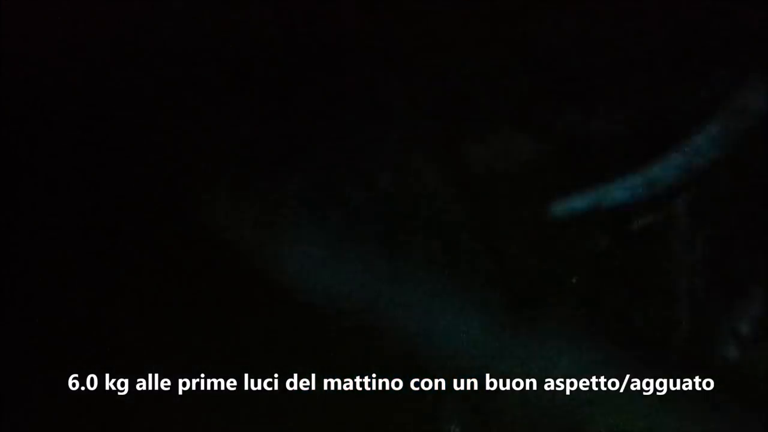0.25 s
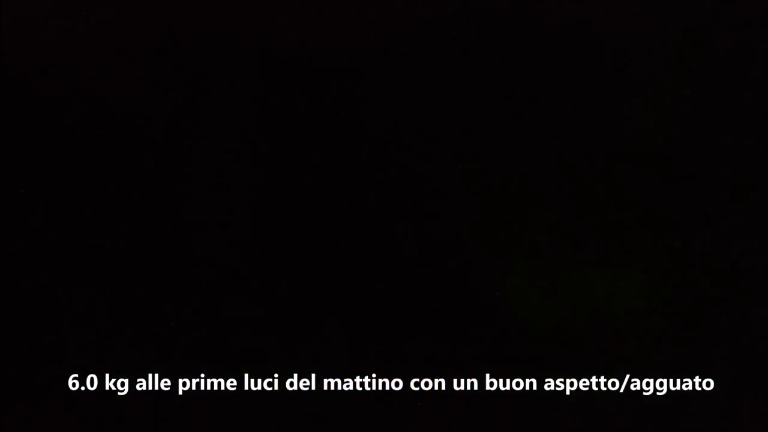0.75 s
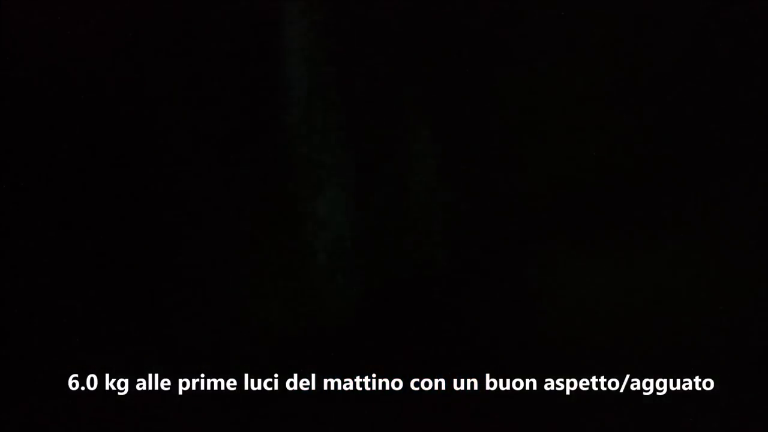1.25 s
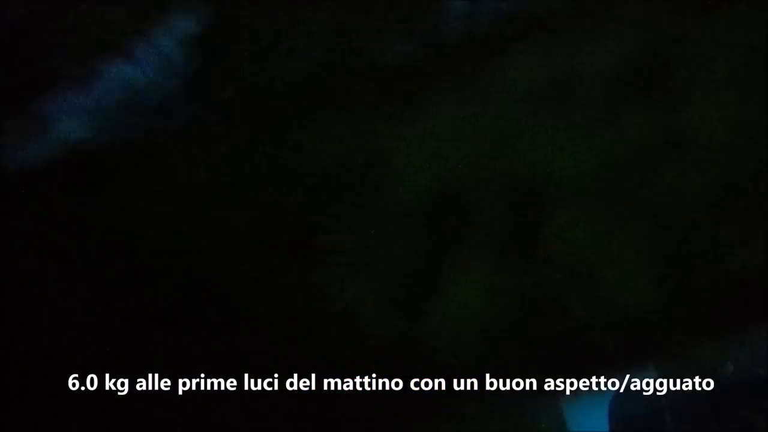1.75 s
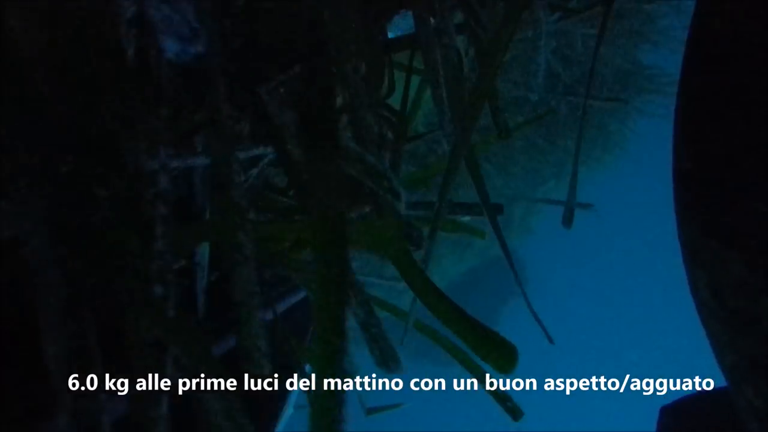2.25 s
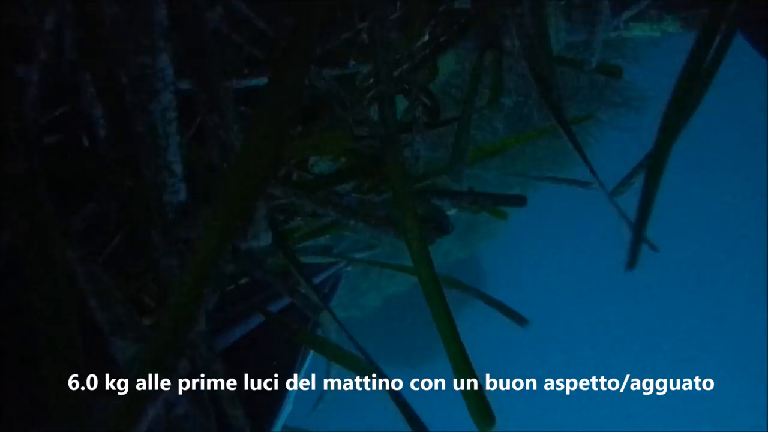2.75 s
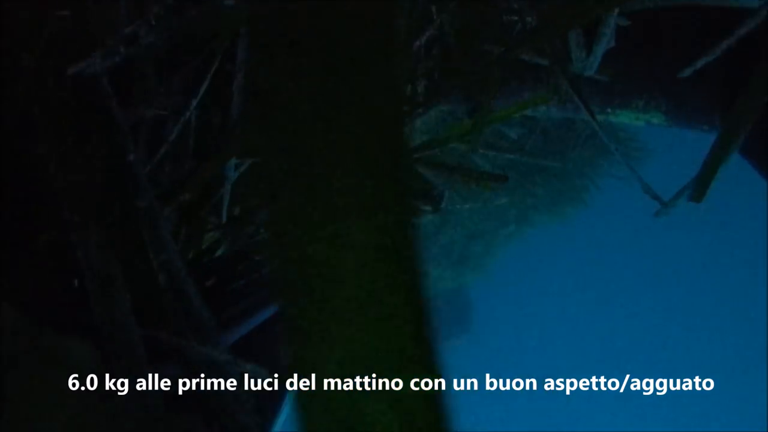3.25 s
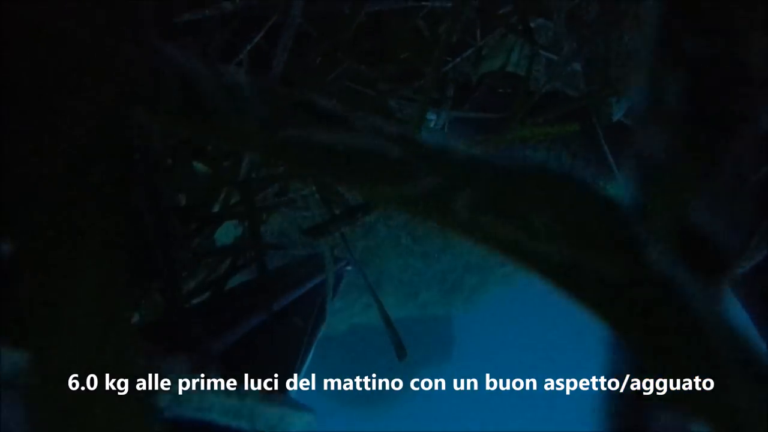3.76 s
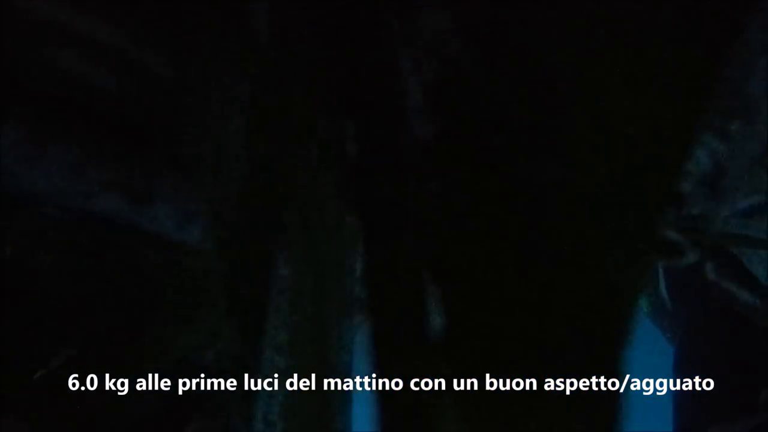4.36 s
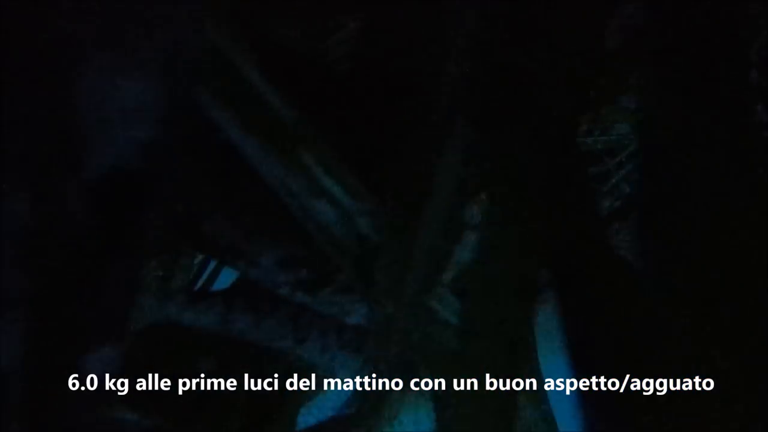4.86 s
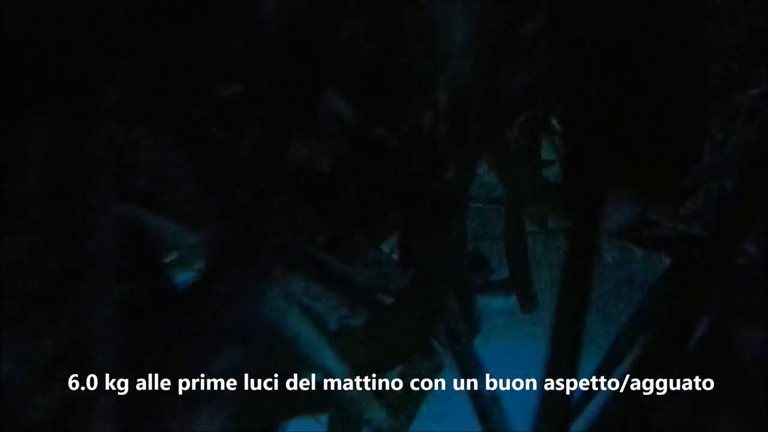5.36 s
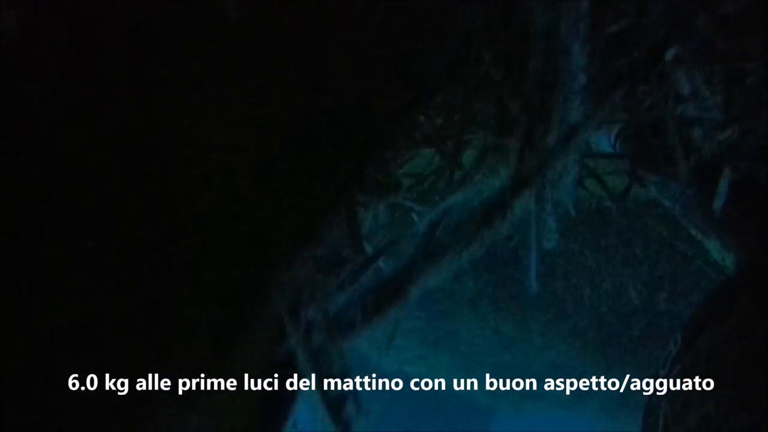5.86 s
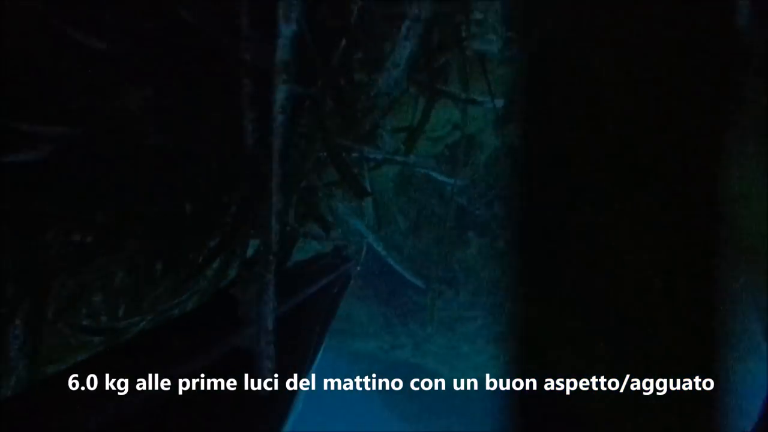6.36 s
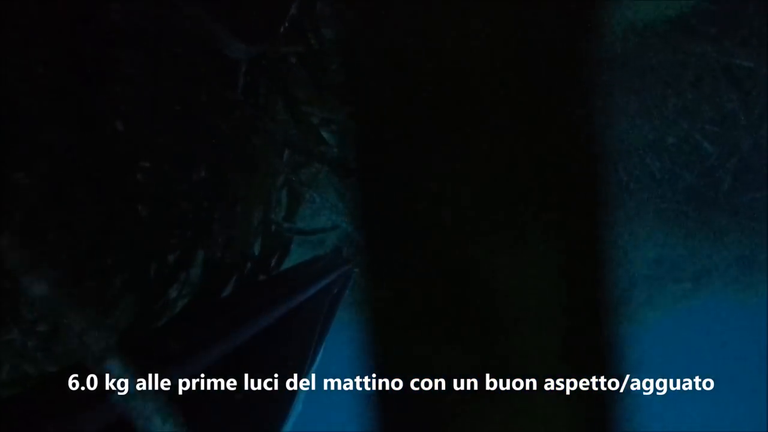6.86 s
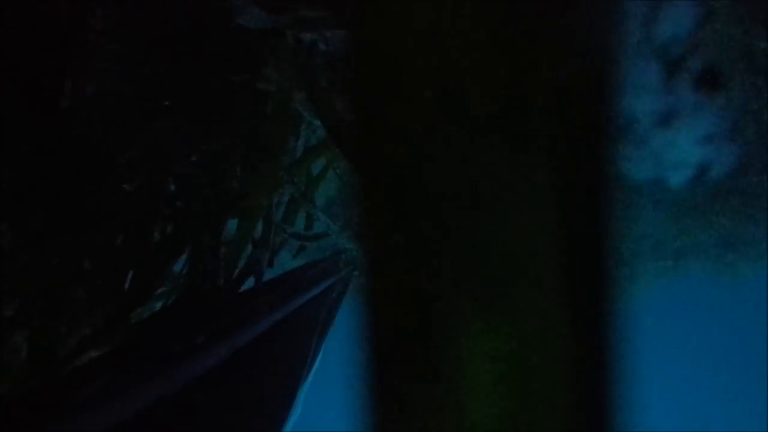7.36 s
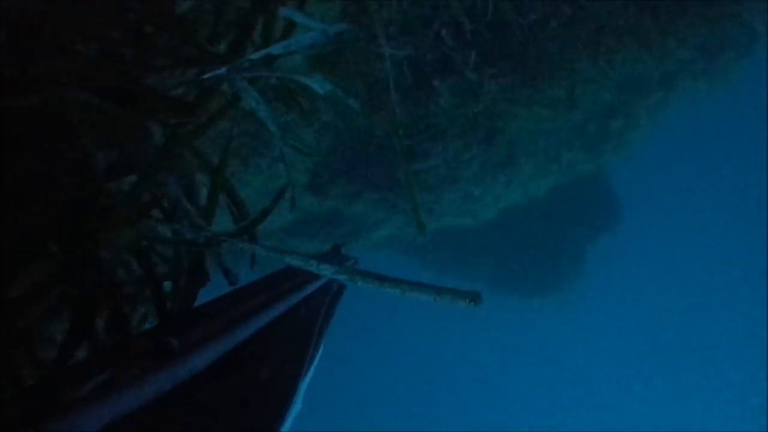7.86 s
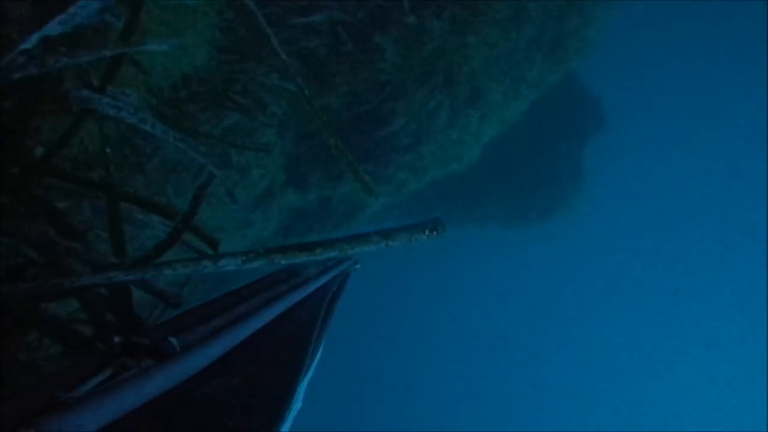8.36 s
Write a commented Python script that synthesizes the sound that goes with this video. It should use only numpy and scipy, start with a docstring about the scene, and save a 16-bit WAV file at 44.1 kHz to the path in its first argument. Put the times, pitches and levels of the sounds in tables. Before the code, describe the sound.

Heard from inside a sealed camera housing underwater, soft leaves brush and tick against the case. A dense rub swells, then light brushing returns. Stems knock and scrape with a bright gritty edge, building to the sharpest knock and a low rumbling shove. Another heavy rub follows, then a near-quiet gap of hiss and faint high whine, before a last rub eases away.

```python
"""A camera in a sealed housing is pulled through a seagrass bed under water.
First leaves brush and tick on the case, a heavy rub follows, then more leaves and a run of gritty scrapes.
The hardest knock and a shove of low rumble lead into another rub; a pause bares hiss and a thin whine,
and rubbing ends it. Strokes are trains of stick-slip clicks and knocks are bursts of grit and decaying
modes, both shaped by the case; rumble and hiss are filtered noise, the whine a wavering sine."""
import sys
import numpy as np
from scipy import signal
from scipy.fft import rfft, irfft, next_fast_len
from scipy.io import wavfile
from scipy.ndimage import uniform_filter1d

SR = 44100
rng = np.random.default_rng(int(sys.argv[2]) if len(sys.argv) > 2 else 0)


def log_audio(samples):
    """Write samples as a 16-bit WAV file to the path given in sys.argv[1]."""
    # one column per channel
    frames = np.atleast_2d(samples).T
    # limit to full scale, then quantise
    limited = np.clip(frames, -1, 1)
    pcm = np.round(limited * 32767).astype(np.int16)
    wavfile.write(sys.argv[1], SR, pcm)


N = 379524
TIME = np.arange(N) / SR
SIZE = next_fast_len(N)
FREQ = np.fft.rfftfreq(SIZE, 1 / SR)

# resonances of the case, heard in every stroke and knock: f/Hz, width/Hz, lift/dB (before any detuning)
HOUSING_MODES = [(384.3, 59, 10), (941, 109, 6), (1366.5, 405, 21.5), (1877, 680, 14), (2443, 327, 13)]
# higher resonances of its wall: f/Hz, width/Hz, lift/dB (before any shift or share)
WALL_MODES = [(3900, 1820, 8), (5955, 210, 9), (7890, 870, 12), (10360, 180, 6.5), (13300, 940, 17)]
# soft leaves brushing past: start t/s, length/s, starting level/dB before trim,
# growth over the stroke/dB, fizz against the level/dB, thud against the level/dB
LEAF_STROKES = [(0.0, 0.25, -70, 4, -6.5, 0), (0.26, 0.25, -58, -1.5, -18, -4.5),
                (0.48, 0.353, -54.5, 0, -14, -10), (0.84, 0.4, -56.5, -2, -15, -11.5),
                (1.21, 0.22, -55, -1, -15, -11), (1.44, 0.28, -58.5, 2, -22, -8.5),
                (2.95, 0.43, -58, -6, -16.5, -10.5), (3.40, 0.17, -62.5, -1, -15, -13),
                (3.52, 0.266, -55, 2.5, -15, -15.5), (3.83, 0.17, -49.5, -1.5, -16, -16),
                (4.04, 0.12, -60, 9, -13, -14), (6.77, 0.13, -64.5, -6, -13, -12),
                (6.92, 0.02, -52, -6, -18, -22), (7.16, 0.24, -74, 1, -12, -10),
                (7.64, 0.09, -67, 12, -12, -13), (8.20, 0.10, -60, 5, -14, -20)]


def amp(db):
    """Decibels to gain."""
    return 10 ** (np.asarray(db) / 20)


def unit(x):
    """Scales to rms 1."""
    return x / np.sqrt(np.mean(x ** 2) + 1e-20)


def read(points):
    """A spectrum in dB, joined by straight lines over log frequency."""
    hz, db = np.transpose(points)
    return np.interp(np.log(FREQ + 1), np.log(hz + 1), db)


def peaks(modes):
    """The lift in dB that a set of resonances gives."""
    return sum(db / (1 + (2 * (FREQ - hz) / width) ** 2) for hz, width, db in modes)


def colour(x, db):
    """Causal, minimum-phase filter with the given gain: resonances ring after each click."""
    cepstrum = irfft(np.log(amp(db)), SIZE)
    # fold the cepstrum onto positive time
    cepstrum[1:SIZE // 2] *= 2
    cepstrum[SIZE // 2 + 1:] = 0
    response = np.exp(rfft(cepstrum))
    return irfft(rfft(x, SIZE) * response, SIZE)[:N]


def wander(hz):
    """Random motion of rms 1, mostly slower than the given rate."""
    noise = rfft(rng.standard_normal(SIZE))
    return unit(irfft(noise / (1 + (FREQ / hz) ** 4), SIZE)[:N])


def add(mix, s, sound):
    """Mixes a sound in at its time."""
    part = mix[max(round(s * SR), 0):][:len(sound)]
    part += sound[:len(part)]


def stillness(hiss_db=-66.5, whine_hz=11900, wobble_hz=90, wall_share=0.4):
    """Steady hiss of still water and microphone, faintly coloured by the wall, and a wavering whine."""
    # hiss before the wall colours it: f/Hz, relative level/dB per Hz
    hiss_colour = [(30, -3), (200, -2.5), (400, -0.5), (700, -9.5), (950, 1.5), (1150, -6), (1380, 1),
                   (2400, -10.5), (5000, -17), (8000, -19.5), (12500, -26), (15000, -31)]
    # the electronic whine, strongest in the long pause: t/s, level/dB before flutter
    whine_level = [(6.6, -102), (6.85, -86), (7.55, -85), (7.8, -102)]
    s, db = np.transpose(whine_level)
    turns = np.cumsum(whine_hz + wobble_hz * wander(90)) / SR
    flutter = amp(3.6 * wander(30))
    whine = amp(np.interp(TIME, s, db)) * flutter * np.sqrt(2) * np.sin(2 * np.pi * turns)
    hiss = colour(rng.standard_normal(N), read(hiss_colour) + wall_share * peaks(WALL_MODES))
    return amp(hiss_db) * unit(hiss) + whine


def surge(drift_db=-73.5, trim_db=1.0):
    """Low eddies press on the case; they build up to each shove and settle after it."""
    # shoves of the case through the water: peak t/s, level/dB before trim, rise/s, fall/s
    shoves = [(2.8, -58.5, 0.5, 0.13), (4.2, -58, 0.04, 0.066), (4.48, -57, 0.02, 0.22),
              (5.92, -45, 0.2, 0.074), (6.4, -60, 0.37, 0.35), (7.95, -50, 0.1, 0.16)]
    # rumble of the pushed water: f/Hz, relative level/dB per Hz
    surge_colour = [(8, -15), (22, 3.5), (42, 1.5), (62, -2.5), (85, -7.5), (130, -12), (220, -20),
                    (600, -66)]
    power = amp(drift_db) ** 2  # the eddies between shoves
    for s, db, rise_s, fall_s in shoves:
        distance = np.maximum((s - TIME) / rise_s, (TIME - s) / fall_s)
        power = power + (amp(db) * np.exp(-distance)) ** 2
    rumble = unit(colour(rng.standard_normal(N), read(surge_colour)))
    return amp(trim_db) * np.sqrt(power) * rumble


def slips(per_s, spread_db, catch_db, catch_hz, smooth, snag_db=3.0, snags_per_s=22, release_s=0.033):
    """Stick and slip: tiny clicks of uneven size, bunched where a surface catches and lets go."""
    sizes = amp(spread_db * np.minimum(rng.exponential(1, N), 4)) * rng.choice([-1, 1], N)
    clicks = unit(sizes * (rng.random(N) < per_s / SR))
    force = clicks + smooth * rng.standard_normal(N)
    force = force * amp(catch_db * wander(catch_hz))
    # even out the level over 25 ms
    force /= np.sqrt(uniform_filter1d(force ** 2, size=1100) + 1e-9)
    # a snag breaks free at once, then the tension eases
    breaks = rng.random(N) < snags_per_s / SR
    snags = np.tanh(signal.lfilter([1], [1, -np.exp(-1 / (release_s * SR))], breaks))
    return force * amp(snag_db * unit(snags - snags.mean()))


def pressing(strokes, attack_s=0.0069, release_s=0.011):
    """Gains of ring, fizz and thud: each stroke catches, grows or eases steadily, and lets go."""
    power = np.zeros((3, N))
    for start, length, db, growth_db, fizz_db, thud_db in strokes:
        t = np.arange(0, length + 10 * release_s, 1 / SR)
        shape = np.minimum(t / attack_s, 1) * np.exp(-np.maximum(t - length, 0) / release_s)
        gain = shape * amp(db + growth_db * np.minimum(t / length, 1))
        for band, band_db in zip(power, [0, fizz_db, thud_db]):
            add(band, start, (gain * amp(band_db)) ** 2)
    return np.sqrt(power)


def friction(strokes, force, colour_db, trim_db, shift_db=2.16, shift_hz=45):
    """Slips sound through the case; each stroke sets how much it rings, fizzes and thuds."""
    # where the strength of ring, fizz and thud is taken: low f/Hz, high f/Hz
    ranges = [(1100, 2700), (4000, 16000), (200, 700)]
    spectrum = rfft(colour(force, colour_db + peaks(HOUSING_MODES)), SIZE)
    thud = 1 / (1 + (FREQ / 800) ** 6)
    fizz = 1 - 1 / (1 + (FREQ / 3200) ** 6)
    shares = [1 - thud - fizz, fizz, thud]
    out = np.zeros(N)
    for share, (low, high), gain, db in zip(shares, ranges, pressing(strokes), trim_db):
        strength = np.std(irfft(spectrum * ((FREQ > low) & (FREQ < high)), SIZE))
        # the colour shifts as the point of contact moves
        shift = amp(shift_db * wander(shift_hz))
        part = irfft(spectrum * share, SIZE)[:N] / strength * shift
        out += part * gain * amp(db)
    return out


def swishing(width_hz=2800):
    """A finely toothed leaf edge gives a short, narrow band of gritty hiss."""
    # single leaf edges sliding over the case: middle t/s, length/s, centre f/Hz, level/dB before the fade
    swishes = [(0.486, 0.031, 7900, -50), (0.53, 0.12, 7600, -69), (0.682, 0.064, 6700, -61),
               (0.91, 0.16, 7500, -65.5), (1.119, 0.037, 7400, -59), (1.185, 0.031, 7140, -58),
               (1.783, 0.037, 12000, -59), (1.979, 0.061, 7370, -50), (3.908, 0.044, 5950, -51.5),
               (4.442, 0.17, 12500, -49.5), (4.564, 0.12, 12600, -53.5), (4.98, 0.63, 12500, -59.5),
               (7.632, 0.15, 12400, -68)]
    teeth = slips(per_s=830, spread_db=3.0, catch_db=7.0, catch_hz=120, smooth=0.32)
    out = np.zeros(N)
    for s, length, hz, db in swishes:
        start = s - length / 2
        piece = teeth[round(start * SR):][:round(length * SR)]
        piece_hz = np.fft.rfftfreq(len(piece), 1 / SR)
        band = 1 / (1 + (2 * (piece_hz - hz) / width_hz) ** 4)
        hiss = unit(irfft(rfft(piece) * band, len(piece)))
        add(out, start, amp(db) * hiss * np.hanning(len(piece)))
    return out


def brushing():
    """Soft leaves patter on the case in fairly even slips."""
    # force of a brushing leaf: f/Hz, relative level/dB per Hz
    brush_force = [(100.0, -0.5), (250.0, -4.5), (700.0, -1), (1500.0, 0.5), (3000.0, -7), (5000.0, -12),
                   (7500.0, -15.5), (9500.0, -22), (12500.0, -29), (15500.0, -30)]
    force = slips(per_s=1700, spread_db=1.5, catch_db=2.5, catch_hz=93, smooth=0.26, snag_db=2.0)
    return friction(LEAF_STROKES, force, read(brush_force), trim_db=[-.3, -.8, -.8])


def rubbing(wall_shift=1.022, roam=0.22):
    """Dense, heavy slips ring the wall; firm pressure stiffens it and thins the low tones."""
    # heavy rubbing along the wall: start t/s, length/s, starting level/dB before trim,
    # growth/dB, fizz against the level/dB, thud against the level/dB
    rubs = [(1.71, 0.15, -52, 4, -14.5, -12), (1.87, 0.47, -42, -2.5, -13.5, -15),
            (2.33, 0.4, -40.5, 3, -13, -17), (2.74, 0.06, -40, -2.5, -16, -13.5),
            (2.80, 0.167, -48, -2.5, -16.5, -11.5), (4.135, 0.12, -44.5, 4, -12.5, -21.5),
            (4.26, 0.047, -50, -3, -15, -16), (5.95, 0.33, -43.5, 3.5, -15, -16),
            (6.235, 0.13, -36.5, -0.5, -13, -17.5), (6.385, 0.3, -39, -1, -14, -17.5),
            (6.72, 0.04, -39.5, -12.5, -20, -13), (6.955, 0.016, -41.5, -5.5, -22, -30),
            (7.10, 0.043, -52, 6.5, -18, -31), (7.72, 0.11, -52.5, 10.5, -14.5, -16.5),
            (7.83, 0.18, -37, 0, -10.5, -19.5), (8.02, 0.17, -38, -2.5, -14, -19),
            (8.305, 0.14, -46.5, -0.5, -14, -19.5), (8.46, 0.16, -48.5, -11, -13, -24)]
    # force of a heavy rub: f/Hz, relative level/dB per Hz
    rub_force = [(100.0, -12), (250.0, -8.5), (700.0, -8), (1500.0, -2.5), (3000.0, -8), (5000.0, -12),
                 (7500.0, -19), (9500.0, -16.5), (12500.0, -33), (15500.0, -31.5)]
    # how firmly the case is pressed, before it roams: t/s, share/0-1
    pressure = [(2.8, 0.14), (6.0, 0.63), (7.8, 0.87)]
    # change of colour under firm pressure: f/Hz, width/Hz, lift/dB
    firm_colour = [(230, 130, -1), (566, 310, -4.5), (874, 130, 6), (3650, 210, 7), (5960, 260, 10),
                   (10400, 470, 10), (10900, 600, -4)]
    loose = slips(per_s=3500, spread_db=3.0, catch_db=1.5, catch_hz=140, smooth=0.36, snag_db=-0.6)
    firm = slips(per_s=2000, spread_db=3.5, catch_db=1.5, catch_hz=111, smooth=0.3, snag_db=2.4)
    loose_wall = [(hz / wall_shift, width, db) for hz, width, db in WALL_MODES]
    firm_wall = [(hz * wall_shift, width, db) for hz, width, db in WALL_MODES]
    loose = colour(loose, peaks(loose_wall))
    firm = colour(firm, peaks(firm_wall) + peaks(firm_colour))
    share = np.clip(np.interp(TIME, *np.transpose(pressure)) + roam * wander(12.6), 0, 1)
    force = np.sqrt(1 - share) * loose + np.sqrt(share) * firm
    return friction(rubs, force, read(rub_force), trim_db=[-.7, -.6, -.6])


def scraping():
    """Rough, crusted stems rasp with a bright, gritty edge."""
    # stems scraping close to the microphone: start t/s, length/s, starting level/dB before trim,
    # growth/dB, fizz against the level/dB, thud against the level/dB
    scrapes = [(4.32, 0.10, -56, 6, -11, -16), (4.415, 0.074, -49, 3, -9.5, -11.5),
               (4.51, 0.13, -49, -1, -13, -18), (4.62, 0.13, -41, -10, -13.5, -15.5),
               (4.76, 0.3, -47, -1.5, -9.5, -14), (5.07, 0.12, -43, -8.5, -7.5, -12),
               (5.21, 0.082, -46.5, -20.5, -13.5, -8.5), (5.37, 0.078, -54.5, -0.5, -9, -8),
               (5.46, 0.2, -44.5, 1, -7, -13.5), (5.61, 0.17, -38, -0.5, -10.5, -18),
               (5.78, 0.097, -36, 1, -9, -10), (5.875, 0.051, -37, -3, -3.5, -2.5)]
    # force of a scraping stem: f/Hz, relative level/dB per Hz
    scrape_force = [(100.0, -6.5), (250.0, -4), (700.0, -5), (1500.0, 6), (3000.0, -7), (5000.0, -14.5),
                    (7500.0, -13.5), (9500.0, -24), (12500.0, -18), (15500.0, -30)]
    force = slips(per_s=2200, spread_db=3.0, catch_db=-1.0, catch_hz=150, smooth=0.7, snag_db=2.8)
    return friction(scrapes, force, read(scrape_force), trim_db=[-.4, -.4, -.4])


def stray_ticks(count=24, over_db=16, spread_db=-1.5, crack_db=-15, hard_db=-18):
    """Small stems tap at random while leaves brush, louder with the brushing: rows like the knocks."""
    ring = pressing(LEAF_STROKES)[0]
    at = rng.choice(np.flatnonzero(ring > 0), count)
    levels = 20 * np.log10(ring[at]) + over_db + spread_db * rng.standard_normal(count)
    return [(i / SR, db, db + crack_db, hard_db) for i, db in zip(at, levels)]


def knocks(swell=1.85, soft_hz=1600, damping_hz=110, crack_s=0.00092,
           ring_trim_db=-3.5, crack_trim_db=2.5, top_trim_db=-1.5,
           push_hz=190, push_s=0.002, push_db=-20, heavy_db=-15):
    """Each blow is a sharp crack, while the modes of the case swell and die within milliseconds."""
    # stems and gear knocking on the case: t/s, peak of the ring/dB, peak of the crack/dB,
    # hardness (top of the crack against the rest)/dB, all levels before trim
    blows = [(0.0294, -35.5, -55, -14), (0.2588, -34.5, -52, -22), (0.3886, -33.5, -52, -21),
             (0.4816, -36, -36.5, -15), (0.4907, -31.5, -38.5, -21), (0.688, -34.5, -46, -39),
             (1.077, -34, -67, -22), (1.8836, -26, -33, -15), (2.5059, -19.5, -40, -18),
             (2.63, -27, -40, -29), (2.8954, -25.5, -37.5, -19), (2.9176, -24.5, -39, -17),
             (3.093, -38, -60, -22), (3.2, -35.5, -52.5, -27), (3.3985, -34.5, -49.5, -14),
             (3.418, -38.5, -54, -14), (3.6481, -33.5, -48, -16), (3.6906, -34.5, -48, -16),
             (3.7646, -32, -48, -19), (3.7802, -33, -51, -16), (3.8328, -30, -42.5, -24),
             (3.969, -34, -52, -15), (4.03, -39, -31.5, 8.5), (4.0758, -51, -48.5, 10),
             (4.165, -21, -32.5, 0), (4.2213, -21, -41, -20), (4.233, -21.5, -41, -16),
             (4.316, -30.5, -25.5, -1.5), (4.4703, -20, -34, -8), (4.475, -20, -44, -6),
             (4.6239, -21.5, -32.5, -5), (4.851, -25, -42, -10), (4.9597, -26, -35, -21),
             (5.3837, -12.5, -27.5, -17), (5.3916, -16.5, -27, -31), (5.3945, -13.5, -24, -29),
             (5.7822, -24, -33, 10), (5.8006, -17.5, -45, -9), (5.8646, -31, -31, 3),
             (5.9234, -10, -14, -4), (6.2442, -20, -35, -6), (6.5103, -18, -32, -13),
             (6.7068, -22.5, -35.5, -24), (6.799, -34.5, -50, -20), (6.9972, -30.5, -53, -17),
             (7.2823, -39.5, -58, -6), (7.4, -39, -51, -15), (7.781, -26.5, -37, -19),
             (7.8323, -21.5, -36, -25), (7.911, -32, -28, -22), (8.033, -28, -27, -23),
             (8.3221, -24.5, -37.5, -13), (8.3839, -22.5, -34.5, -17)]
    # crack before the wall rings with it: f/Hz, relative level/dB per Hz
    crack_colour = [(500, -8.5), (2000, 4.5), (4000, -2.5), (7000, -11), (10000, -7.5), (11500, -5.5),
                    (13500, -7), (16000, -24)]
    t, out = np.arange(1400) / SR, np.zeros(N)
    grit = colour(rng.standard_normal(N), read(crack_colour) + peaks(WALL_MODES))
    dull = signal.sosfilt(signal.butter(10, 10800, "low", fs=SR, output="sos"), grit)
    sharp = signal.sosfilt(signal.butter(6, 11000, "high", fs=SR, output="sos"), grit)
    crack_shape = np.exp(-t / crack_s) * (1 - np.exp(-10 * t / crack_s))
    for s, ring_db, crack_db, hard_db in [*blows, *stray_ticks()]:
        ring = np.zeros(len(t))
        detune = rng.uniform(1, 1.05)  # the contact stiffens the case a little
        for hz, width, db in HOUSING_MODES:
            age = np.pi * np.hypot(width, damping_hz) * t / swell  # and damps its longest modes
            size = amp(db + rng.standard_normal()) * width / (1 + (hz / soft_hz) ** 2)
            ring += size * age * np.exp(-age) * np.sin(2 * np.pi * hz * detune * t)
        # the whole case recoils, in full only from heavy blows
        push = t / push_s * np.exp(1 - t / push_s) * np.sin(2 * np.pi * push_hz * t)
        push *= amp(min(ring_db - heavy_db, 0))
        body = ring / abs(ring).max() + amp(push_db) * push
        add(out, s, amp(ring_db + ring_trim_db) * body)
        dull_db, sharp_db = crack_db + crack_trim_db, crack_db + hard_db + top_trim_db
        for noise, db in [(dull, dull_db), (sharp, sharp_db)]:
            crack = noise[round(s * SR):][:len(t)] * crack_shape
            add(out, s, amp(db) * crack / abs(crack).max())
    return out


def scene():
    """Everything reaches one microphone inside the case."""
    background = stillness() + surge()
    contacts = swishing() + brushing() + rubbing() + scraping() + knocks()
    return (background + contacts)[None]


def record(dry, edge_hz=15800):
    """The recorder's band limit: a steep low-pass."""
    low_pass = signal.firwin(511, edge_hz, window=("kaiser", 9), fs=SR)
    return signal.oaconvolve(dry, low_pass[None], "same")


dry = scene()
out = record(dry)
log_audio(out)
```